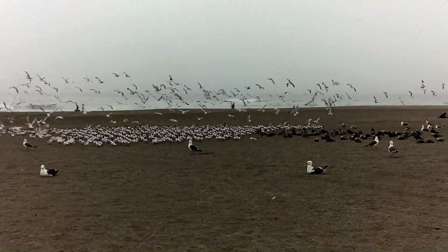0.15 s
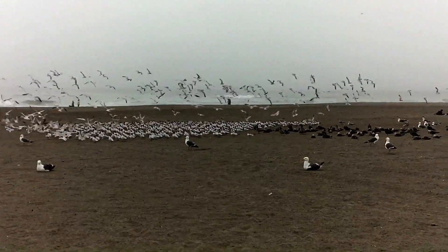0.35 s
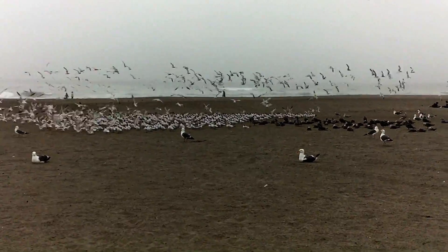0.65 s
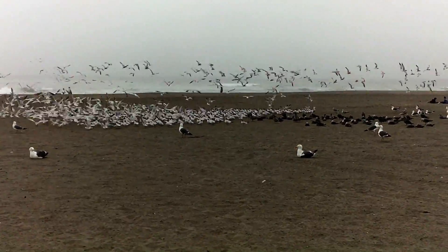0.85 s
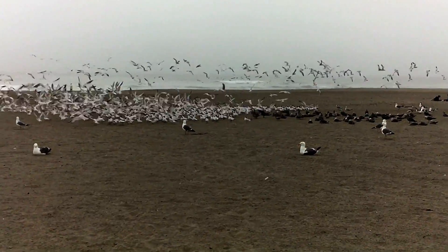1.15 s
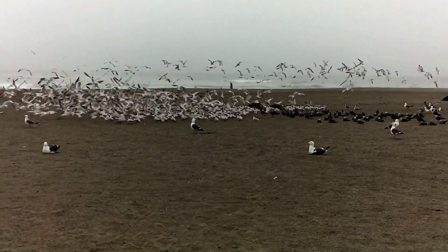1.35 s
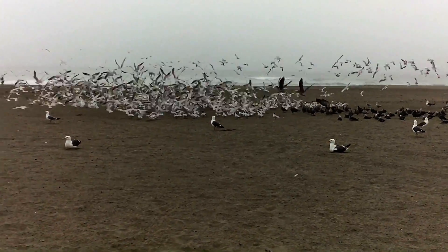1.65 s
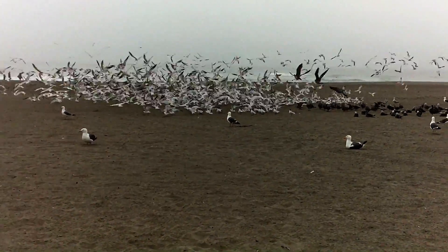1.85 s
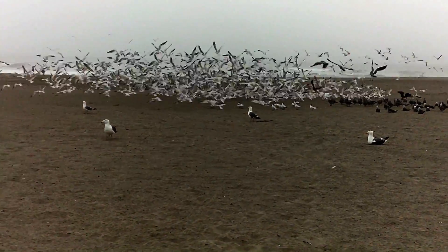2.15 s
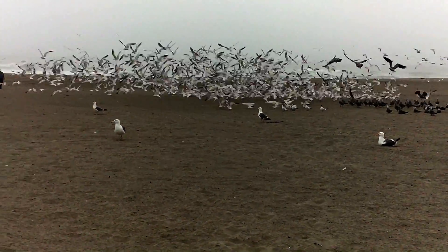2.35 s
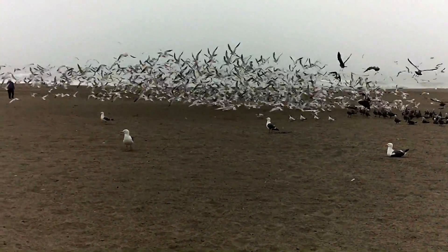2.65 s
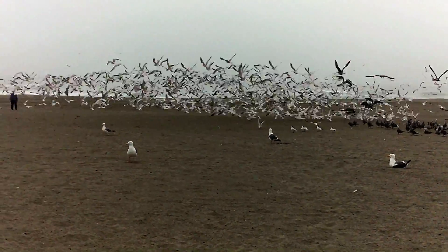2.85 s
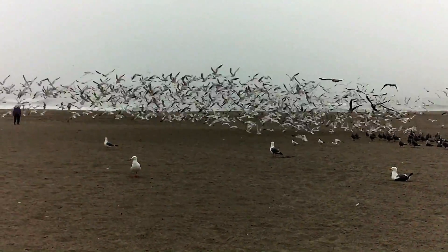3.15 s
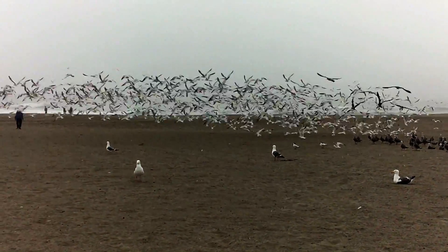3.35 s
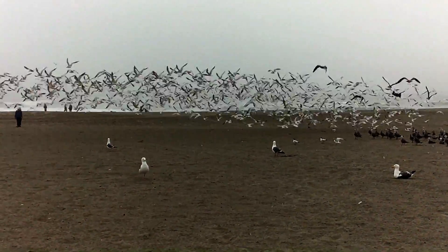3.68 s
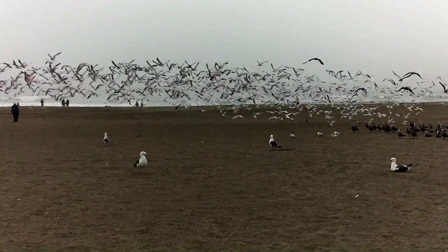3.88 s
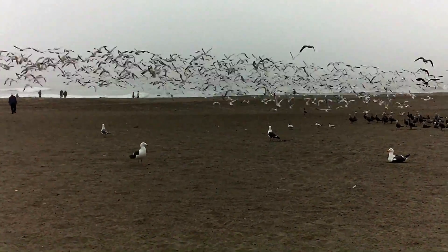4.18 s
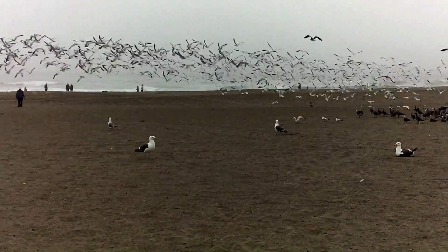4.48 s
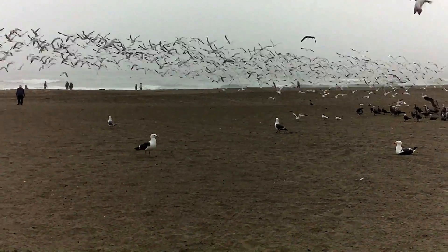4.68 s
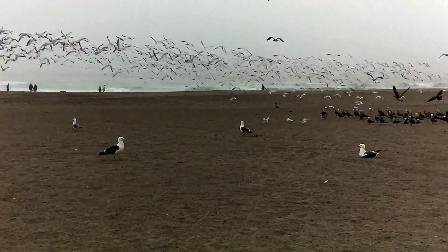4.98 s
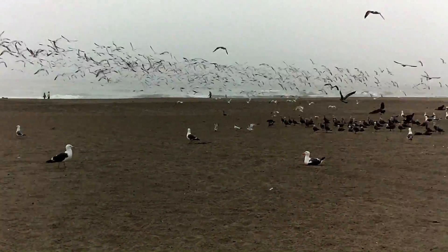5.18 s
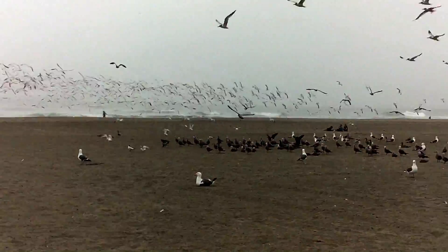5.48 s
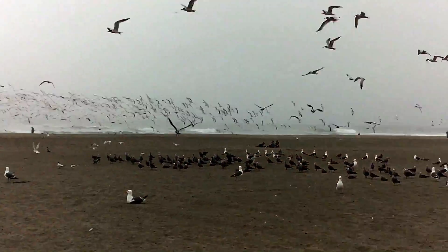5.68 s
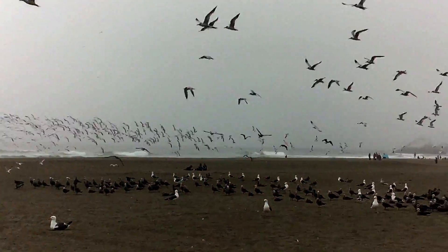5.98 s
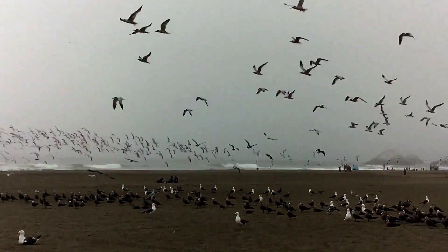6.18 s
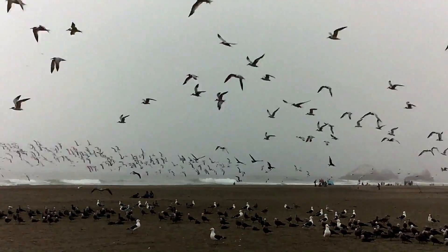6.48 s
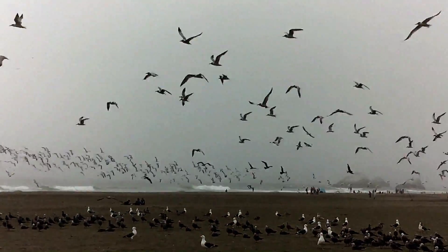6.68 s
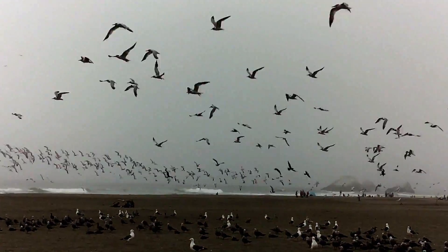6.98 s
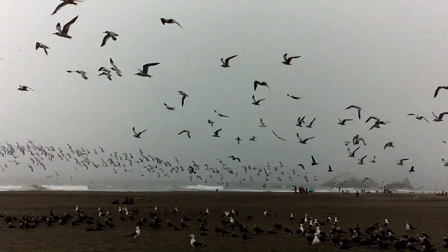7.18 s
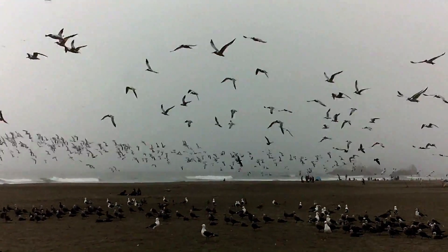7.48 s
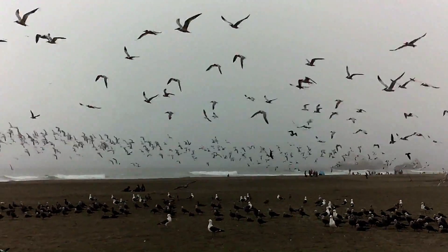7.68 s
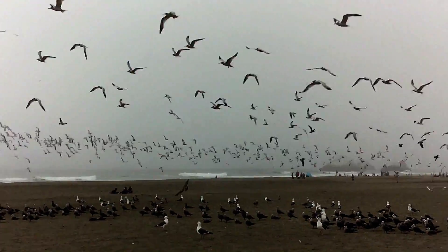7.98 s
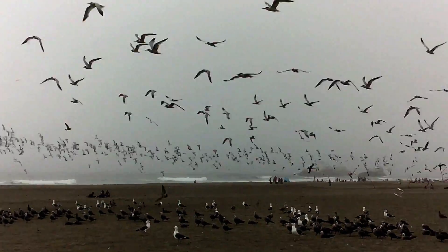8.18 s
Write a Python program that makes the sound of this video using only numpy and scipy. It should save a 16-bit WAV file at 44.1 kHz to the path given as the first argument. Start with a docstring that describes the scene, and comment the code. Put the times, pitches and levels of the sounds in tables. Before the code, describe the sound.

Continuous tern chatter, harsh and nasal, built from very short stuttering pips and falling cries. The crowd ebbs briefly, then surges, growing brighter and nearer in the second half. Low gusts buffet the unshielded microphone, one making a brief low wavering hoot past the middle. Weak steady surf and a low unsteady hum lie far below the birds. Open sandy shore, dry and almost centred, with slightly dulled extreme treble.

```python
"""Terns flock over an open beach: short pips and arched cries near 1.3 kHz, strongest in the second harmonic.
Close birds are heard one by one, each a stack of unsteady harmonics; the farther ones merge into a crowd.
Thin single-line whistles pass, some near 4 kHz and some below 1.1 kHz; air noise hisses with the tern voices.
Surf hisses and rumbles as banded noise; gusts of low noise buffet the microphone, one sings across its port,
and a low hum wavers underneath. Left and right are nearly the same."""
import sys
import numpy as np
from scipy import signal
from scipy.io import wavfile
from scipy.ndimage import uniform_filter1d

SR = 44100
rng = np.random.default_rng(int(sys.argv[2]) if len(sys.argv) > 2 else 0)


def generate_wav(sig):
    """Save sig (samples, or channels by samples) to the path in sys.argv[1] as 16-bit PCM at SR."""
    pcm = np.round(np.clip(np.atleast_2d(sig).T, -1, 1) * 32767).astype(np.int16)
    wavfile.write(sys.argv[1], SR, pcm)


N = 367794

CRY_FALL = 0.0844   # a listed cry ends lower by this share of its pitch
CRY_ODD_DB = -5   # odd harmonics above the first, in most cries
NEAR_TILT_DB = 3   # per harmonic, for the nearest bird
NOTE_S, BREAK_S, RISE_S, CLOSE_S = .02, .021, .026, .023
SHORT_WAIT_S, WAIT_S = .030, .0077   # last pip to closing cry, after a short or a full rattle
# pitches at start, middle and end, as multiples of the phrase's pitch
WHISTLE_BEND, NOTE_BEND = np.array([1.08, 1.09, 1.02]), np.array([1.0, 1.0, .99])
RISE_BEND, CLOSE_BEND = np.array([.97, 1.01, 1.03]), np.array([1.03, .99, .89])
PIP_SLIDE, RATTLE_SLIDE = .045, -.025   # a pip slides up, a rattle's pip down, as shares of the pitch

# Nearest bird's phrases: start t/s, first pip t/s, pips, pitch f/Hz, level/dB
NEAREST_PHRASES = [(5.151, 5.232, 2, 1473, -43), (5.809, 5.893, 5, 1458, -39), (6.519, 6.598, 5, 1463, -38),
                   (7.24, 7.323, 5, 1466, -42), (7.978, 8.053, 5, 1458, -40)]
# Pips of its rattle, a pair and then three: t/s after the first pip
RATTLE_TIMES = [0, .014, .047, .062, .077]


def nearest_bird():
    """One throat repeats whistle, note, rattle of pips and a closing cry that rises and falls."""
    cries, pips = [], []
    for start, rattle, count, hz, db in NEAREST_PHRASES:
        note = rattle - BREAK_S - NOTE_S
        times = rattle + np.array(RATTLE_TIMES[:round(count)])
        full = len(times) == len(RATTLE_TIMES)
        close = times[-1] + (WAIT_S if full else SHORT_WAIT_S)
        cries += [(start, note - start, hz * WHISTLE_BEND, db, NEAR_TILT_DB - 2, -21),
                  (note, NOTE_S, hz * NOTE_BEND, db, NEAR_TILT_DB, CRY_ODD_DB),
                  (close, RISE_S, hz * RISE_BEND, db, NEAR_TILT_DB, -10),
                  (close + RISE_S, CLOSE_S, hz * CLOSE_BEND, db, NEAR_TILT_DB, CRY_ODD_DB)]
        pips += [(s, .945 * hz, db + 1.5, NEAR_TILT_DB + .64, -6.5, RATTLE_SLIDE) for s in times]
    return cries, pips


# Single cries of other near birds: t/s, length/s, mid-cry pitch f/Hz, rise into it as a share,
# level/dB, tilt/dB per harmonic above the second
NEAR_CRIES = [(0.144, 0.037, 1215, -.04, -43.5, -3.5), (0.204, 0.025, 1406, .06, -47.5, -10),
              (0.246, 0.029, 1312, -0.036, -46.5, -2.5), (0.361, 0.032, 1170, 0.047, -61, 1.5),
              (0.451, 0.045, 1133, .03, -67, 5), (0.567, 0.058, 1354, 0.012, -63, 7),
              (0.692, 0.073, 1336, 0.096, -44.5, 0), (0.774, 0.099, 1165, -0.065, -46, -1.5),
              (0.854, 0.066, 1263, 0.0048, -42, -6), (0.982, 0.057, 1217, -0.077, -49.5, -4),
              (1.084, 0.041, 1335, 0.058, -46, -0.5), (1.112, 0.043, 1255, 0.0069, -48, -4),
              (1.409, 0.032, 1225, 0.0054, -49.5, 0.5), (1.591, 0.042, 1416, 0.14, -56, -10),
              (1.702, 0.022, 1300, -0.039, -45, -11), (1.743, 0.029, 1396, 0.2, -45.5, -18),
              (1.791, 0.042, 1324, -0.024, -46.5, -5.5), (1.984, 0.048, 1290, -0.035, -43.5, -1),
              (2.123, 0.053, 1262, 0.06, -43.5, -0.5), (2.359, 0.019, 1305, 0.016, -46, -8.5),
              (2.784, 0.042, 1293, 0.012, -49.5, -2.5), (2.831, 0.026, 1184, 0.033, -58, 1.5),
              (2.874, 0.029, 1244, .2, -59, -1), (2.908, 0.044, 1394, -0.051, -48, -4),
              (2.948, 0.064, 1197, -0.059, -47, 3), (3.086, 0.063, 1261, 0.1, -42.5, -2.5),
              (3.353, 0.032, 1234, -0.029, -52.5, -1), (3.536, 0.029, 1396, -0.021, -57, -4),
              (3.732, 0.065, 1223, 0.11, -51.5, 1), (3.961, 0.038, 1482, -0.14, -51.5, -6),
              (4.089, 0.044, 1500, 0.023, -50.5, -3.5), (4.186, 0.035, 1313, -0.022, -42, -8),
              (4.231, 0.065, 1350, 0.078, -45.5, 2), (4.341, 0.042, 1202, 0.025, -50, -15),
              (4.435, 0.018, 1410, 0.045, -47, 3), (4.487, 0.04, 1377, 0.061, -40, 4),
              (4.633, 0.05, 1280, 0.02, -38, 2), (4.787, 0.046, 1520, -0.0053, -49.5, -5),
              (4.903, 0.038, 1250, -.04, -49.5, 2), (4.907, 0.055, 1460, -0.0043, -53, 0.5),
              (5.076, 0.053, 1265, 0.0012, -45.5, -8), (5.322, .03, 1236, .02, -42, -6),
              (5.381, 0.037, 1170, -0.001, -44, -2), (5.63, 0.046, 1198, -0.086, -45, 3),
              (5.678, 0.052, 1295, 0.07, -45.5, 3), (6.033, 0.084, 1277, 0.026, -44.5, -10),
              (6.083, 0.024, 1270, 0.025, -46, 0.5), (6.448, 0.028, 1287, -0.072, -44.5, 5),
              (7.01, 0.04, 1244, 0.038, -44.5, 5), (7.462, 0.051, 1340, 0.012, -51, -5),
              (7.532, 0.016, 1350, -0.018, -42, 4), (7.617, 0.032, 1253, .02, -50, -12),
              (7.793, 0.0202, 1396, 0.041, -50, 4.5), (7.849, 0.037, 1238, 0.082, -43, 4)]


def arched_cries():
    """Each cry bends through its middle pitch and ends lower."""
    return [(s, length, [hz * (1 - rise), hz, hz * (1 - CRY_FALL)], db, tilt_db, CRY_ODD_DB)
            for s, length, hz, rise, db, tilt_db in NEAR_CRIES]


# Runs of pips from other near birds; a lone pip sits midway between its two times when its pips value is 1 or
# less, # but at the first time when that value is above 1: # first t/s, last t/s, pips (rounded), pitch f/Hz,
# level/dB, tilt/dB per harmonic above the second
PIP_RUNS = [(.008, .028, 2, 1290, -46, -12), (.045, .08, 3, 1140, -52, -5), (.103, .12, 2, 1155, -46, -5),
            (0.287, .316, 3, 1193, -55.5, 0), (.49, .505, 2, 1200, -52.5, 1.5),
            (0.531, .547, 2, 1210, -48, -2), (0.576, 0.66, 2, 1016, -63, 7.5),
            (0.63, .651, 2, 1143, -57.5, 5.5), (.665, .665, 1, 1160, -50, 2),
            (.695, .76, 4.6, 1178, -53.5, 4), (.79, 0.88, 1.2, 1150, -51, 0.5),
            (.895, .895, 1, 1170, -56, 2.5), (.935, .96, 1.8, 1204, -51, 1.5),
            (1.045, 1.068, 2, 1204, -51, -1), (1.153, 1.3, 0.86, 1290, -39.5, -17),
            (1.175, 1.255, 6, 1080, -47, -6), (1.27, 1.287, 2, 1090, -43, -4.5),
            (1.305, 1.34, 3, 1147, -51, 0), (1.362, 1.394, 3, 1112, -52, -9),
            (1.45, 1.479, 3, 1202, -44.5, -1), (1.506, 1.522, 1.8, 1260, -51.5, -4),
            (1.577, 1.577, 1, 1154, -56, -5), (1.642, 1.642, 1, 1210, -50, -9),
            (1.659, 1.659, 1, 1336, -50, -6), (1.67, 1.687, 2, 1060, -55.5, -4),
            (1.832, 1.866, 3, 1210, -57.5, -4), (1.964, 1.977, 2, 1205, -55.5, 3.5),
            (2.029, 2.105, 3.4, 1117, -50.5, 4), (2.188, 2.205, 2, 1152, -51, 3),
            (2.22, 2.265, 4.2, 1163, -59.5, 3), (2.326, 2.326, 1, 1190, -53.5, -4),
            (2.344, 2.344, 0.92, 1280, -52.5, -7), (2.39, 2.391, 1.1, 1210, -49, -7),
            (2.413, 2.431, 2, 1177, -47.5, -3.5), (2.455, 2.489, 3.1, 1177, -48, -7.5),
            (2.505, 2.552, 3.77, 1222, -50.5, -6), (2.632, 2.632, 1, 1250, -54.5, -1),
            (2.651, 2.651, 1.01, 1316, -51, -2.5), (2.668, 2.668, 0.89, 1400, -56.5, -2.5),
            (2.7, 2.716, 2, 1255, -46.5, -24), (2.74, 2.741, 1.03, 1238, -45.5, -21),
            (2.76, 2.76, 1, 1354, -44, -17), (2.892, 2.891, 1.04, 1157, -47, 2.5),
            (2.93, 3.05, 9, 1180, -48.5, 0.5), (3.157, 3.218, 5, 1130, -52, 1.5),
            (3.245, 3.29, 3, 1434, -59, 0), (3.31, 3.345, 3, 1300, -47.5, -6),
            (3.399, 3.415, 2, 1170, -47.5, -3), (3.438, 3.455, 2, 1145, -48, -6),
            (3.474, 3.522, 3.66, 1234, -47, -4), (3.63, 3.72, 7, 1194, -55.5, 0),
            (3.819, 3.835, 2, 1116, -52, 0), (3.916, 3.962, 3.73, 1419, -41.5, 2.5),
            (4.028, 4.07, 3, 1313, -47.5, -0.5), (4.14, 4.175, 2, 1296, -48, 1.5),
            (4.473, 4.486, 2, 1257, -39.5, 4), (4.537, 4.538, 1.1, 1158, -44.5, 5),
            (4.59, 4.632, 3, 1205, -38.5, 1.5), (4.822, 4.854, 1.8, 1272, -45, 1),
            (4.97, 5.003, 1.57, 1304, -48, -1), (5.043, 5.061, 1.74, 1057, -45, -11),
            (5.131, 5.146, 2.14, 1366, -48.5, -1.5), (5.252, 4.8, 0.92, 1340, -49, -3),
            (5.369, 5.369, 1, 1220, -40, -7), (5.455, 5.487, 3, 1366, -41.5, 2.5),
            (5.522, 5.616, 5.26, 1166, -42, 4), (5.756, 5.8, 4, 1270, -55.5, 3.5),
            (6.063, 6.079, 1.86, 1257, -46, 2.5), (6.098, 6.168, 5.1, 1253, -48.5, 3),
            (6.261, 6.28, 2, 1315, -50, 2.5), (6.305, 6.321, 2, 1253, -45, 3),
            (6.386, 6.385, 0.87, 1234, -48.5, 3.5), (6.42, 6.435, 2, 1198, -47.5, 5),
            (6.485, 6.51, 1.9, 1283, -43.5, 4.5), (6.758, 6.771, 2.27, 1323, -51, 3),
            (6.795, 6.821, 2.62, 1356, -55, 4.5), (6.837, 6.853, 1.8, 1261, -38.5, 3),
            (6.882, 6.898, 2, 1212, -34.5, 0), (6.933, 6.932, 1, 1132, -42, 3.5),
            (6.976, 7.5, 2, 1143, -40, 2), (7.059, 7.091, 2.74, 1230, -51, 5.5),
            (7.215, 7.233, 1.9, 1320, -59, 3.5), (7.468, 7.468, 1, 1346, -50.5, 3.5),
            (7.492, 7.52, 3, 1330, -51, 3), (7.555, 7.555, 1, 1330, -42.5, -1),
            (7.573, 7.59, 2, 1313, -53, 2.5), (7.682, 7.699, 2, 1274, -50, 1),
            (7.73, 7.744, 2.2, 1200, -53, 5), (7.898, 7.948, 3.9, 1180, -41.5, 4),
            (7.961, 7.974, 2.12, 1249, -43.5, 4), (8.3, 8.3, 1, 1143, -47, -9),
            (8.333, 8.333, 1, 960, -41, -14)]


def pip_runs():
    """Evenly spaced pips; the pitch arches over a run and sags along it."""
    arch, sag = .029, .03   # shares of the pitch
    pips = []
    for first, last, count, hz, db, tilt_db in PIP_RUNS:
        for u in np.linspace(-1, 1, round(count)) * (count > 1):
            s = (first + last + u * (last - first)) / 2
            pips.append((s, hz * (1 - arch * (u * u - .5) - sag * u), db, tilt_db, 0, PIP_SLIDE))
    return pips


def near_terns():
    """The close voices sounded one by one, each with a small random share in the side channel."""
    out = np.zeros((2, N))
    phrase_cries, rattle_pips = nearest_bird()
    cries, pips = arched_cries() + phrase_cries, pip_runs() + rattle_pips
    hoarseness = 1.4
    unsteady = throat(.010, 410, hoarseness)
    for (s, length, hz, db, tilt_db, odd_db), side in zip(cries, rng.normal(0, 1, len(cries))):
        add_note(out, unsteady, side, s, length, hz, voice(db, tilt_db, odd_db), edge=.003)
    pip_s, hoarseness = .009, 1.7
    unsteady = throat(.011, 410, hoarseness)
    chances = rng.normal(0, 1, (len(pips), 11))
    for (s, hz, db, tilt_db, odd_db, slide), (side, louder, higher, *colour) in zip(pips, chances):
        levels = voice(db + .5 * louder, tilt_db, odd_db) + .33 * np.array(colour)   # scatter in dB
        hz = hz * (1 + .013 * higher)
        bend = [(1 - slide) * hz, hz, (1 + .4 * slide) * hz]
        add_note(out, unsteady, side, s - pip_s / 2, pip_s, bend, levels, edge=.0013)
    return out


# A tern's voice, harmonics 1 to 8: level/dB
VOICE_HARMONICS = [-17.5, 0, -2.5, -10.5, -21.5, -34.5, -47.5, -48.5]


def voice(db, tilt_db, odd_db):
    """Harmonic levels: distance tilts them above the second, the throat favours odd or even ones."""
    k = np.arange(1, 9)
    tilt = tilt_db * np.maximum(k - 2, 0)
    odd = odd_db * (k % 2) * (k > 1)
    fundamental = -.028 * np.clip(tilt_db, -6, 6) * (k == 1)   # duller voices keep more of it
    return db + np.array(VOICE_HARMONICS) + tilt + odd + fundamental


def throat(wobble, wobble_rate, hoarseness):
    """An unsteady syrinx: a pitch factor, then a wandering gain per harmonic, shaken by air noise."""
    pitch = 1 + wobble * drift(wobble_rate) + .012 * drift(22)   # quick wobble and slow waver
    gains = []
    for k in range(len(VOICE_HARMONICS)):
        wander = from_db(3.6 * drift(30))
        shake = 1 + hoarseness * (.07 + .03 * k) * drift(550)   # upper harmonics shake more
        gains.append(wander * shake)
    return np.array([pitch, *gains])


def add_note(out, unsteady, side, s, length, hz, db, edge):
    """One note: harmonics of levels db on a parabola through three pitches, soft edges, in mid and side."""
    first = max(round((s - edge) * SR), 0)
    last = np.clip(round((s + length + edge) * SR), first, N)
    t = np.arange(first, last) / SR - s
    u = t / length
    pitch = hz[0] * (1 - u) * (1 - 2 * u) + 4 * hz[1] * u * (1 - u) + hz[2] * u * (2 * u - 1)
    phase = 2 * np.pi * np.cumsum(pitch * unsteady[0, first:last]) / SR
    ramp = np.clip(np.minimum(t + edge, length + edge - t) / (2 * edge), 0, 1)
    shape = np.sin(np.pi / 2 * ramp) ** 2
    k = np.arange(1, len(db) + 1)
    harmonics = unsteady[k, first:last] * np.sin(k[:, None] * phase)
    out[:, first:last] += shape * (from_db(db) @ harmonics) * [[1], [side]]


# The crowd of farther birds, before its lulls: t/s, level/dB
CROWD_LEVEL = [(0.0, -43), (.55, -59), (.75, -44), (1.4, -52), (1.7, -67.5), (2.01, -49.5), (2.15, -50.5),
               (2.7, -69), (2.86, -65.5), (2.93, -48), (3.16, -41), (3.64, -49.5), (4.1, -57.5),
               (4.51, -39), (4.95, -47.5), (5.32, -44), (6.76, -47.5), (7.02, -41.5), (7.15, -50.5),
               (8.33, -47)]
# The crowd falls quiet: from t/s, to t/s, depth/dB
CROWD_LULLS = [(0.243, 0.51, 16), (1.033, 1.102, 33), (1.513, 1.597, 22), (1.84, 1.984, 32),
               (2.237, 2.617, 25), (3.185, 3.587, 27), (3.847, 3.939, 17), (5.017, 5.148, 23),
               (7.693, 7.72, 18)]


def crowd_db():
    """The crowd's level, sinking in each lull."""
    t = np.arange(N) / SR
    edge_s = .079
    dips = [db * np.clip(np.minimum(t - start, end - t) / edge_s + .5, 0, 1)
            for start, end, db in CROWD_LULLS]
    return in_time(CROWD_LEVEL)[0] - sum(dips)


# The flock comes nearer, so the crowd brightens: t/s, tilt/dB per harmonic above the second
FLOCK_NEARING = [(3.6, -5), (4.6, -3)]


def crowd(count, pip_gap=.018, colour_db=4.5, rasp_db=2.0):
    """Birds overlap: pips, a hoarse arched cry, falling pips; long opening runs are louder and brighter."""
    out = np.zeros((2, N))
    hoarseness = 2.0
    unsteady = throat(.012, 300, hoarseness)
    draws, colours = rng.random((count, 6)), rng.normal(0, 1, (count, 8))
    for bird, ((when, pitch, before, after, size, side), colour) in enumerate(zip(draws, colours)):
        s = (bird + when) / count * (N / SR + .2) - .1
        hz = 1150 + 400 * pitch ** 1.3
        lead, trail = int(before * 7), int(after * 5)   # pips before and after the cry
        length = .012 + .045 * size ** 2
        tilt_db = np.interp(s, *np.transpose(FLOCK_NEARING)) + .95 * before
        levels = voice(.5 * before, tilt_db, 1.8) + colour_db * colour
        notes = []
        for left in range(lead, 0, -1):
            at = s - left * pip_gap - .016 * (left // 3)   # a longer gap at every third pip
            notes.append((at, .007, [.92, .955, .97]))
        notes.append((s, length, [.96, 1.03, .92]))
        for k in range(trail):
            notes.append((s + length + .008 + k * pip_gap, .007, [.93 - .01 * k] * 3))
        for at, long, bend in notes:
            add_note(out, unsteady, 8.2 * (side - .5), at, long, hz * np.array(bend), levels, edge=.00199)
    out *= from_db(rasp_db * drift(210))   # quick random level changes make the crowd's voices raspy
    loudness = np.sqrt(uniform_filter1d(out[0] ** 2, size=9000) + 1e-9)
    return from_db(crowd_db()) * out / loudness


def air_hiss(voices):
    """Air through the bills: treble noise that follows the loudness of the voices' upper harmonics."""
    band = signal.butter(2, [4000, 8000], "band", fs=SR, output="sos")
    loudness = np.sqrt(np.abs(uniform_filter1d(signal.sosfilt(band, voices[0]) ** 2, size=90)))
    noise = rms_one(signal.sosfilt(band, rng.standard_normal(N)))
    return from_db(-21) * loudness * noise * [[1], [1]]


# Thin single-line whistles, some high near 4 kHz, some low near 0.7-1 kHz:
# t/s and length/s (both trimmed for the soft edges below), start f/Hz, end f/Hz, level/dB
THIN_WHISTLES = [(0.095, 0.12, 4050, 4020, -56), (0.982, 0.15, 4160, 3920, -62),
                 (3.515, 0.069, 4200, 3900, -67), (4.06, 0.15, 827, 847, -69), (4.521, 0.1, 850, 835, -69),
                 (5.104, 0.132, 773, 887, -69), (6.415, 0.13, 1015, 1023, -61),
                 (8.02, 0.11, 664, 666, -63.5)]


def thin_whistles():
    """Single gliding sines that swell and fade."""
    out, steady = np.zeros((2, N)), np.ones((2, N))
    for s, length, start_hz, end_hz, db in THIN_WHISTLES:
        bend = [start_hz, 1.04 * (start_hz + end_hz) / 2, end_hz]
        add_note(out, steady, 0, s + .0078, length - .03, bend, [db], edge=.025)
    return out


def beach(x, echo_db=-12, tail_db=-22, tail_s=.035):
    """A bounce off the sand and a short scatter among the birds."""
    decay = np.exp(-np.arange(6000) / SR / tail_s)
    response = from_db(tail_db) * rng.standard_normal(6000) * decay / np.sqrt(tail_s * SR / 2)
    response[0], response[round(.0021 * SR)] = 1, from_db(echo_db)
    return signal.fftconvolve(x, response[None], axes=1)[:, :N]


# Colour of the surf: f/Hz, relative level/dB per Hz
SURF_SPECTRUM = [(300, 6), (600, 1), (1000, -1.5), (2000, 1), (4000, -10), (11000, -15)]


def surf():
    """Breaking water as a faintly flickering broad noise."""
    return from_db(-68) * banded_noise(SURF_SPECTRUM, patchy_db=.4, patch_rate=10.)


# Gusts at the microphone: peak t/s, length/s, rise/dB over the steady wind (before its knocks),
# added upper rumble/dB
WIND_GUSTS = [(1.07, 0.36, 9.5, 2), (1.71, 0.6, 12.5, 7.5), (3.402, 0.41, 4.5, 0.5), (4.403, 0.4, 4.5, 8),
              (4.609, 0.31, 7, 9.5), (5.005, 0.26, 0.5, 0), (5.59, 0.26, 7, 6.5), (6.508, 0.13, 6, 2.5)]


def gusts_db():
    """A slowly freshening wind; each gust swells and dies, knocking, and lifts the upper rumble."""
    t = np.arange(N) / SR
    rise_db, reach_db = 0, 0
    for s, length, rise, reach in WIND_GUSTS:
        swell = np.cos(np.pi * np.clip((t - s) / length, -.5, .5)) ** 2
        rise_db, reach_db = rise_db + rise * swell, reach_db + reach * swell
    steady_db = -56 + .4772 * t   # dB, and dB per second
    knocks = 1 + .2 * drift(19.3)
    return steady_db + rise_db * knocks, reach_db


# Colour of the wind noise: f/Hz, relative level/dB per Hz
WIND_SPECTRUM = [(20, -17), (40, -14), (70, 5.5), (200, -4), (300, -19.5), (500, -46), (900, -56)]


def wind():
    """Lumpy low noise buffets the microphone; some gusts reach above 130 Hz and rustle."""
    gust_db, reach_db = gusts_db()
    lumps = banded_noise(WIND_SPECTRUM, patchy_db=3.0, patch_rate=8.9)
    upper = signal.sosfilt(signal.butter(2, 130, "high", fs=SR, output="sos"), lumps)
    rustle_band = signal.butter(2, [260, 520], "band", fs=SR, output="sos")
    rustle = rms_one(signal.sosfilt(rustle_band, rng.standard_normal(N)))
    upper = upper + from_db(-30 + 2.9 * drift(30)) * rustle
    return from_db(gust_db) * (lumps + (from_db(reach_db) - 1) * upper)


# One gust sings across the microphone's port; pitch and level waver around: t/s, f/Hz, level/dB
PORT_SONG = [(5.5, 172.3, -68), (5.55, 174.3, -45), (5.69, 201.9, -37), (5.74, 204, -39.5),
             (5.775, 205, -74)]


def singing_port():
    """A wavering sine on a rising pitch, silent outside the gust."""
    t = np.arange(N) / SR
    hz, db = in_time(PORT_SONG)
    sings = (t > PORT_SONG[0][0]) & (t < PORT_SONG[-1][0])
    level = sings * from_db(db + 3.4 * drift(77.7))
    return level * np.sin(2 * np.pi * np.cumsum(hz * (1 + .043 * drift(32.0))) / SR)


# Partials of the low hum: multiple of 110.6 Hz, relative level/dB
LOW_HUM = [(1, 0), (1.5, -4), (2, -8)]


def hum():
    """A low hum whose pitch wavers and whose partials swell and fade separately."""
    phase = 2 * np.pi * np.cumsum(110.6 * (1 + .0177 * drift(7.96))) / SR
    return sum(from_db(-58 + db + 4.2 * drift(5.1)) * np.sin(k * phase) for k, db in LOW_HUM)


def from_db(db):
    """Gain of a level in dB."""
    return 10 ** (np.asarray(db) / 20)


def rms_one(x):
    """Scaled to rms 1."""
    return x / np.sqrt(np.mean(x ** 2) + 1e-20)


def in_time(rows):
    """Curve columns at every sample, held at the ends."""
    s, *columns = np.transpose(rows)
    return [np.interp(np.arange(N) / SR, s, c) for c in columns]


def drift(rate):
    """Slow chance of spread 1, changing about rate times a second."""
    r = np.exp(-20 * np.pi * rate / SR)   # drawn at every tenth sample
    slow = signal.lfilter([1], [1, -2 * r, r * r], rng.standard_normal(N // 10 + 4002))[4000:]
    return np.interp(np.arange(N) / 10, np.arange(len(slow)), rms_one(slow))


def banded_noise(spectrum, patchy_db, patch_rate):
    """Half-octave bands of noise, each with its own level and flicker plus a shared one; rms 1."""
    out, together = 0, drift(patch_rate)
    edges = 20 * 2 ** np.arange(0, 9.6, .5)
    white = rng.standard_normal((2, N))   # neighbouring bands take different noise
    hz, db = np.transpose(spectrum)
    above = -90 if hz[-1] < 5000 else db[-1]
    for k, (low, high) in enumerate(zip(edges, edges[1:])):
        level_db = np.interp(np.log(low * high) / 2, np.log(hz), db, left=-90, right=above)
        if level_db > -80:
            band = signal.sosfilt(signal.butter(2, [low, high], "band", fs=SR, output="sos"), white[k % 2])
            flicker_db = patchy_db * (.5 * together + drift(patch_rate))
            out = out + band * from_db(level_db + flicker_db)
    return rms_one(out)


def scene():
    """Birds in the open air over surf and wind; nearly mono, with a faint side signal at 1.7-7 kHz."""
    terns = near_terns() + crowd(count=480)
    terns = terns + air_hiss(terns)
    # small throats pass little below the usual pitch
    terns = signal.sosfilt(signal.butter(4, 1080, "high", fs=SR, output="sos"), terns)
    mid, side = beach(terns + thin_whistles())
    side_band = signal.butter(1, [1700, 7000], "band", fs=SR, output="sos")
    side = from_db(-27.5) * signal.sosfilt(side_band, side)
    mid = mid + surf() + wind() + singing_port() + hum()
    return np.array([mid + side, mid - side])


def record(dry):
    """The top is cut steeply, 60 dB down from 11.6 kHz."""
    return signal.sosfilt(signal.cheby2(14, 60, 11600, fs=SR, output="sos"), dry)


dry = scene()
out = record(dry)
generate_wav(out)
```